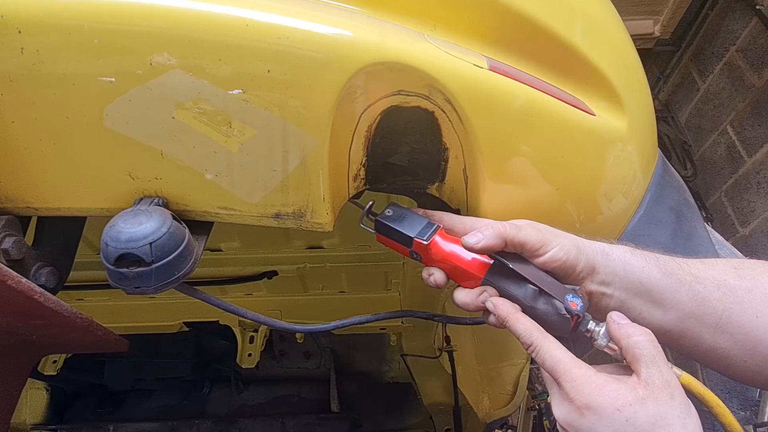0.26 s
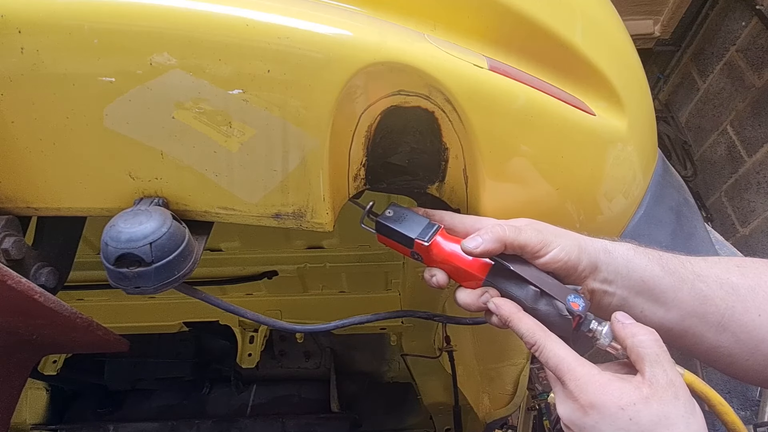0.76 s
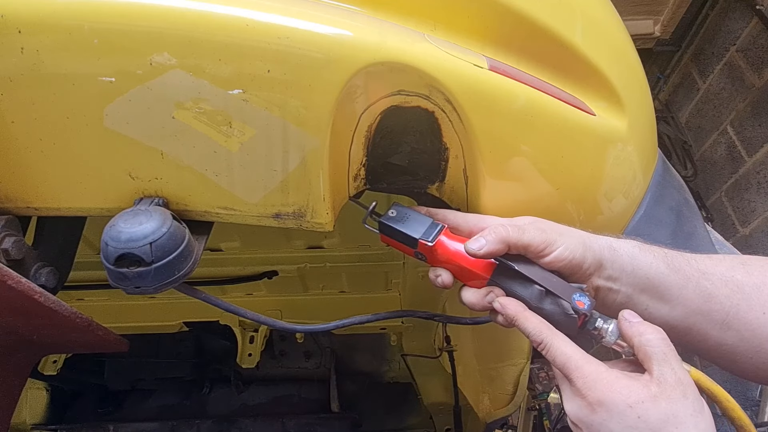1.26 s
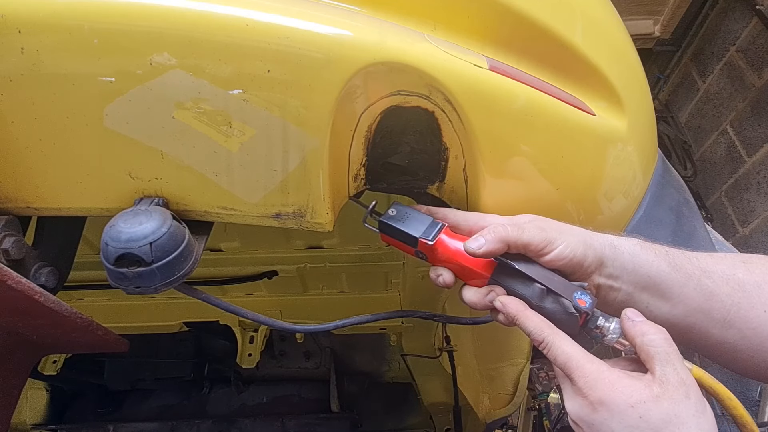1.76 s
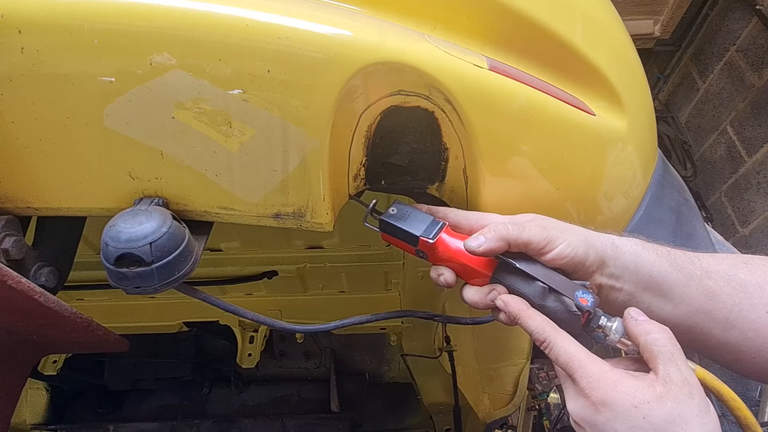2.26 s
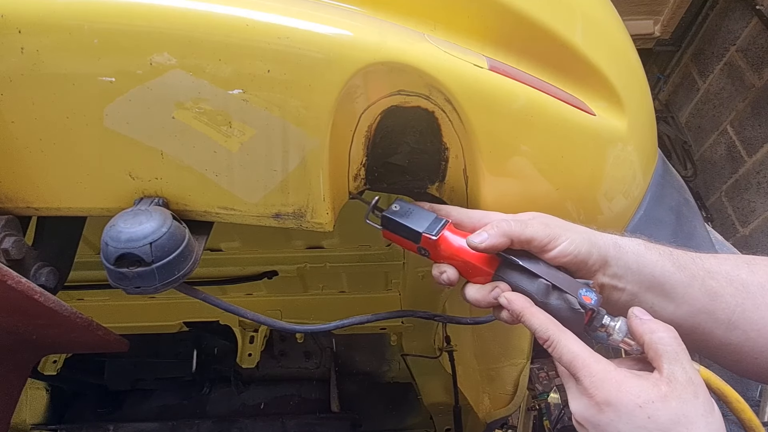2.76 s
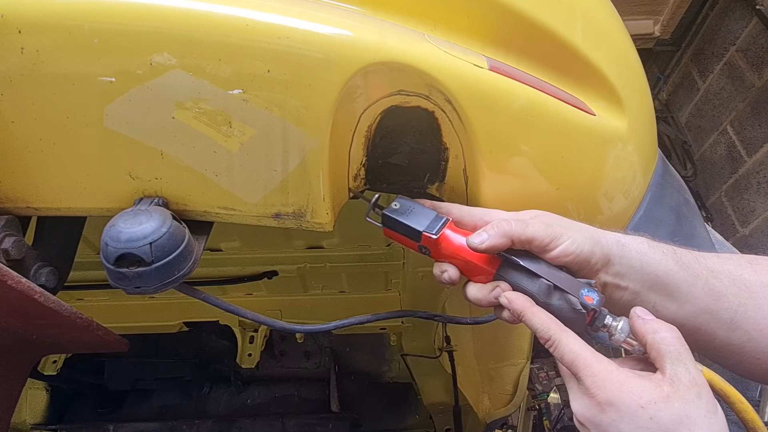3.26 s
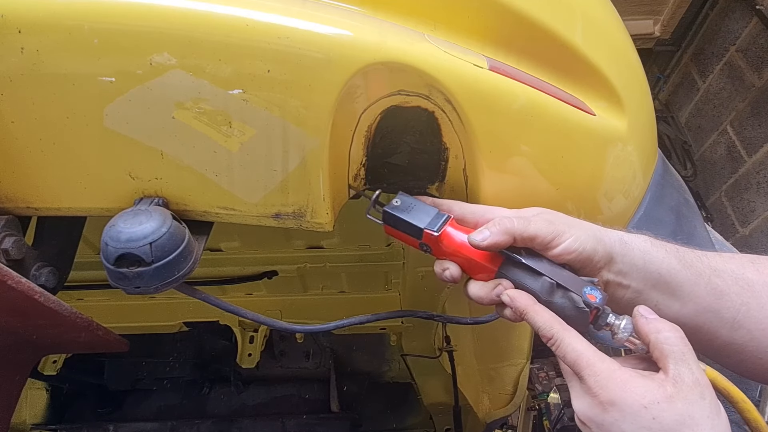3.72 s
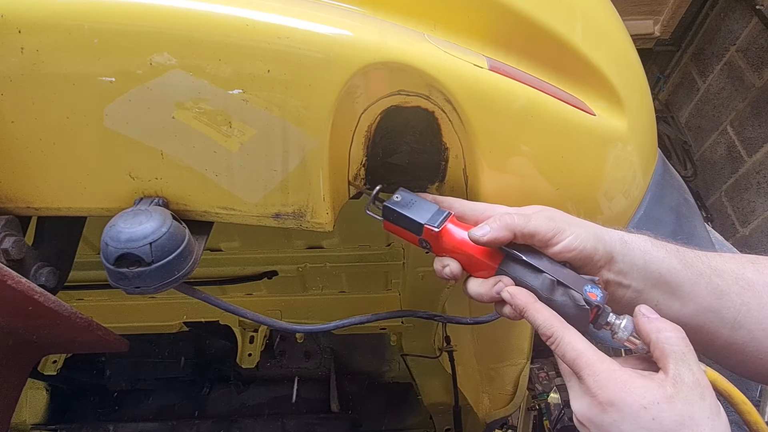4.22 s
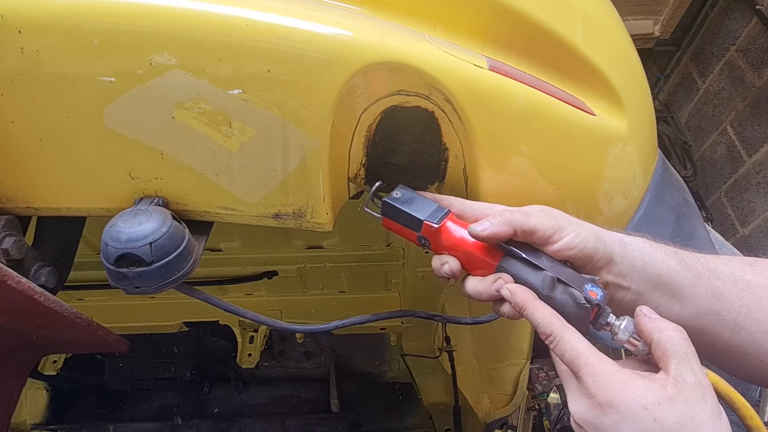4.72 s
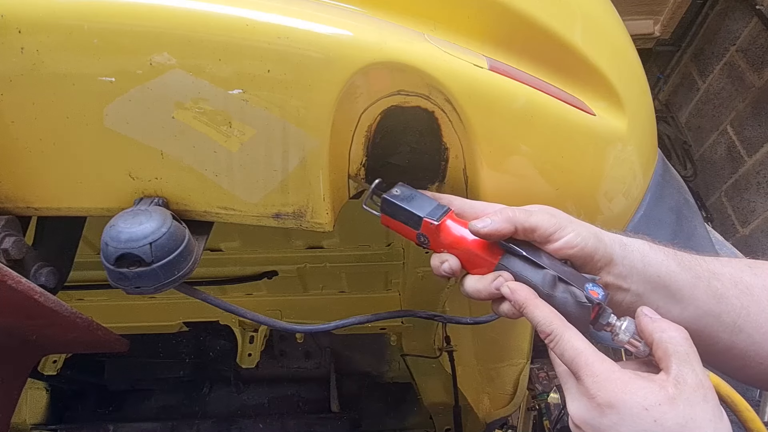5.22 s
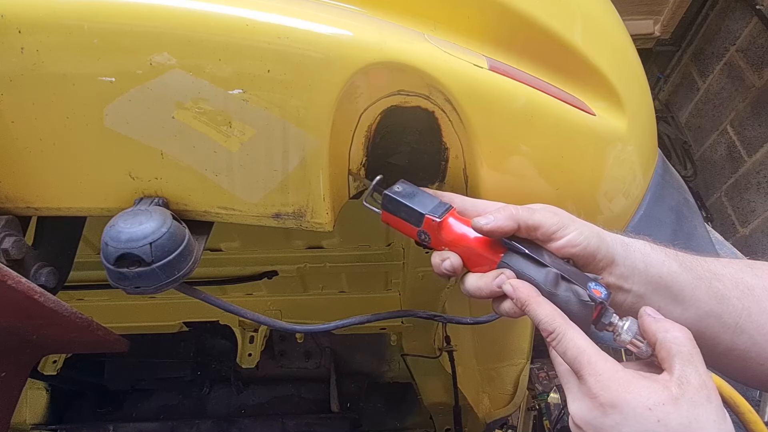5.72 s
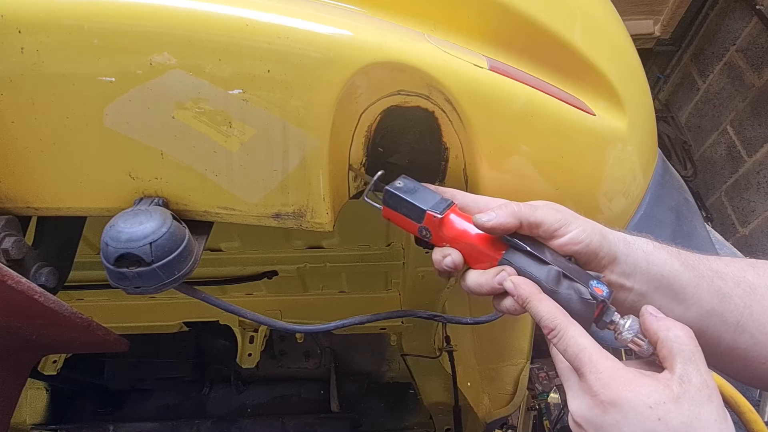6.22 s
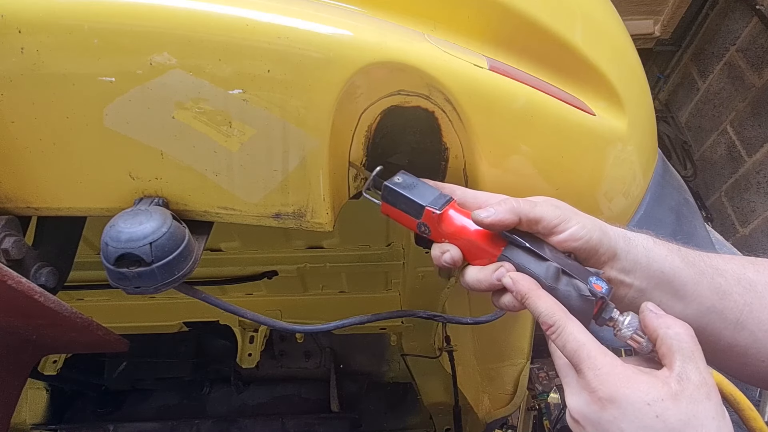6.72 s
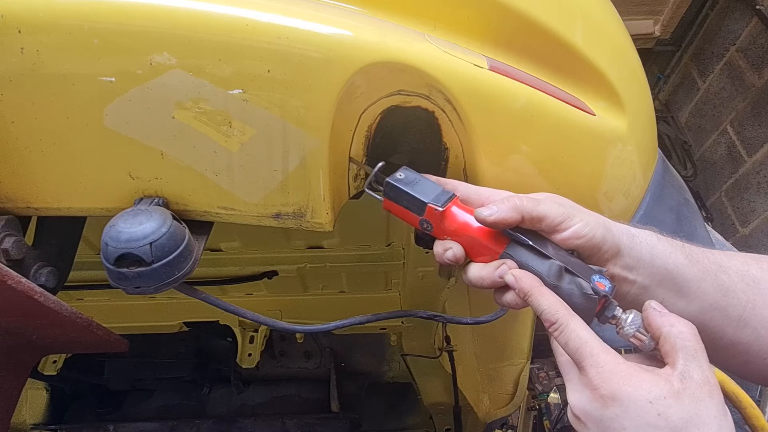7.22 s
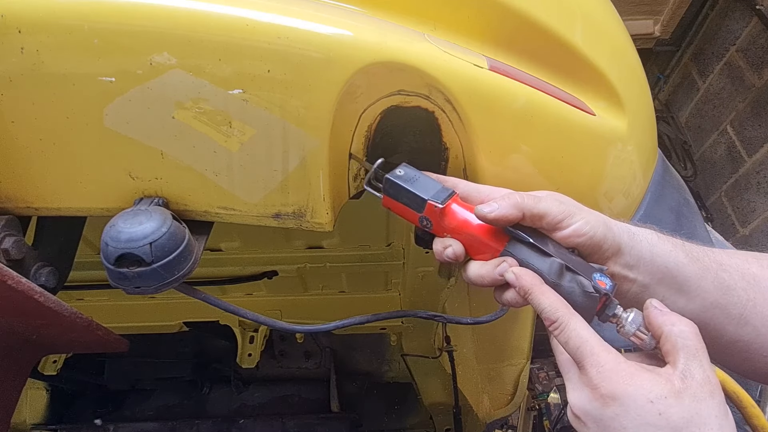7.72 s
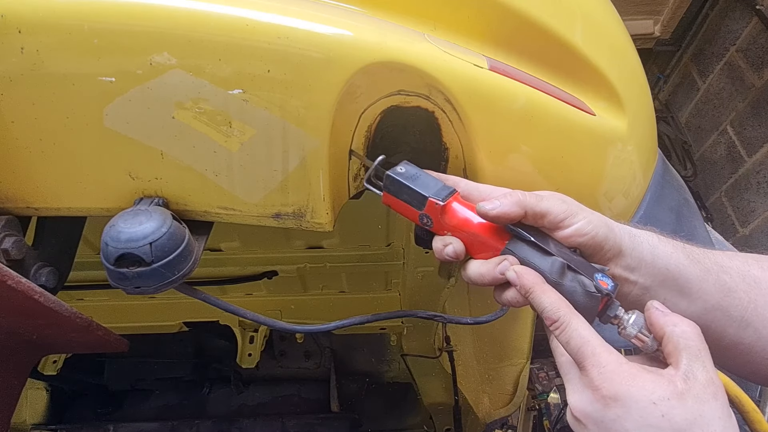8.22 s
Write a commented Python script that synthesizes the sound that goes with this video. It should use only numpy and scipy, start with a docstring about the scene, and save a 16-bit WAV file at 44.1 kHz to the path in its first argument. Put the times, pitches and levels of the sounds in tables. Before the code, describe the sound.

Close up in a garage, an air-powered saw buzzes through a plastic bumper, its rapid strokes rattling the panel over a constant hiss of air. Early on the motor slows a little under load, and the blade briefly binds and snaps free. Around the middle come two short, faint squeaks. The rasping cut carries on evenly, the hiss shifting in tone as the tool turns.

```python
"""A garage, stereo microphone at arm's length from a small pneumatic saw cutting a plastic car bumper.
The piston shakes tool and panel some 137 times a second and slows as the blade bites. The blade knocks
the panel once a stroke and rasps in the cut; spent air hisses out on both strokes and changes colour
as the tool turns along the curve. The loose bumper wobbles underneath. Just before 2 s the blade
binds, chatters and snaps free; around 4 s it is pinched and squeals twice."""
import sys
import numpy as np
from scipy import signal
from scipy.fft import rfft, irfft
from scipy.io import wavfile
from scipy.ndimage import uniform_filter1d, map_coordinates

SR = 44100
rng = np.random.default_rng(int(sys.argv[2]) if len(sys.argv) > 2 else 0)


def wav_out(sig):
    """Save sig, one row per channel (or a flat mono array), as 16-bit PCM at SR to the path in sys.argv[1]."""
    wavfile.write(sys.argv[1], SR, np.round(np.clip(np.atleast_2d(sig).T, -1, 1) * 32767).astype(np.int16))


N = 373968
TIME = np.arange(N) / SR
SIDES = np.array([[1], [-1]])  # left, right

# the blade snags and the panel chatters: t/s, jump/strokes, chatter level/dB
SNAGS = [(1.83, -.015, -21), (1.902, .015, -23), (1.917, -.01, -22)]


def undb(db):
    """Decibels to gain."""
    return 10 ** (np.asarray(db) / 20)


def unit(x):
    """Scale to rms 1."""
    return x / np.sqrt(np.mean(x ** 2))


def curves(table):
    """Each column of a time table, sample by sample."""
    s, *columns = np.transpose(table)
    return [np.interp(TIME, s, c) for c in columns]


def per_bin(table):
    """Each column of a frequency table, on the bins of a whole-length transform."""
    hz, *columns = np.transpose(table)
    bins = np.maximum(np.arange(N // 2 + 1), 1) * SR / N
    return [np.interp(np.log(bins), np.log(hz), c) for c in columns]


def colour(x, spectrum, column=0):
    """Causal filter shaped by (f/Hz, level/dB) rows, output at rms 1: it rings only after a blow."""
    cepstrum = irfft(np.log(undb(per_bin(spectrum)[column])), N)
    response = np.exp(rfft(2 * cepstrum[:N // 2], N) - cepstrum[0])
    return unit(irfft(rfft(x) * response, N))


def walk(rate):
    """Smooth, bounded random wander with spread 1, changing about rate times a second."""
    points = rng.uniform(-1, 1, N // 20)
    return unit(map_coordinates(points, [TIME * rate], order=3, mode="wrap"))


def tremble(rate):
    """A quick wander with its slow drift taken out."""
    x = walk(rate)
    return unit(x - uniform_filter1d(x, int(2 * SR / rate)))


def swell(s, length_s):
    """A rounded, flat-topped bump from 0 to 1 and back, centred on s."""
    return np.exp(-(2 * (TIME - s) / length_s) ** 4)


def blend(a, b, share):
    """Fade from a to b."""
    share = np.clip(share, 0, 1)
    return (1 - share) * a + share * b


def pan(db):
    """Left and right gains for a level difference, left minus right."""
    return undb(SIDES * db / 2)


def puff(strokes, start, rise, fall):
    """A quick swell and slower fall once a stroke; all times in strokes."""
    age = (strokes - start) % 1
    shape = (1 - np.exp(-age / rise)) * np.exp(-age / fall)
    return shape / shape.max()


def contact(light, biting, turned, bite, turn):
    """The panel's answer shifts as the blade bites, and again in the second half of the turn."""
    return blend(light, blend(biting, turned, 2 * turn - 1), bite)


def piston(sag_hz, wander_strokes=0.0035, labour_hz=0.18):
    """Strokes counted so far: the free piston wanders, labours under load and jumps at each snag."""
    # piston speed under load: t/s, stroke rate/Hz
    speed = [(0.0, 145.7), (0.4, 146.7), (0.64, 144.1), (0.87, 139.5), (1.87, 136.8), (1.96, 139.9),
             (2.5, 137.6), (3.24, 138.2), (3.68, 136.8), (4.23, 137.0), (4.58, 136.3), (4.72, 137.3),
             (6.35, 135.6), (6.61, 135.7), (7.3, 134.6), (7.77, 136), (8.24, 134.1), (8.48, 135.2)]
    hz = curves(speed)[0] - sag_hz
    jumps = sum(jump * np.clip((TIME - s) * hz, 0, 1) for s, jump, _ in SNAGS)
    return np.cumsum(hz + labour_hz * tremble(7)) / SR + wander_strokes * walk(30) + jumps


def hum(strokes, force_db, bind_db, bite, turn, flutter_db=0.2348, rough_db=0.47):
    """The piston's recoil swings the panel at partials 1-3; each knock flexes it at partials 4 and 5."""
    # panel hum, a row per multiple of the stroke rate: level/dB barely touching, biting, at the turn's
    # end; share of the force's changes followed/0-1, left minus right at full bite/dB, waver/dB
    partials = [(-38.5, -32.5, -35.5, 0.34, -2, 0.57), (-25, -18, -22, .85, -.5, 0.3),
                (-56, -43.5, -50, 0.2, -.7, 1.8), (-18, -33.5, -30.5, 1, 6.5, 1),
                (-36, -27, -25, 0.8, -2, 0.86)]
    # the fifth partial fades for a moment: t/s, length/s, change/dB
    hollows = [(1.38, 0.15, -7), (3.15, 0.47, -5.5), (5.07, 0.22, -4.5), (7.8, 0.43, -3.5)]
    swing_lag, flex_lag = 0.43, 0.059  # strokes behind the knock
    # the saw settles against the panel and pushes it one-sidedly, lifting partials 1 and 3
    seat_s, seat_takes_s, seat_db = 1.61, 0.14, 7.5
    seated_db = seat_db * np.clip((TIME - seat_s) / seat_takes_s + .5, 0, 1)
    hollow_db = sum(db * swell(s, length_s) for s, length_s, db in hollows)
    extra_db = {1: seated_db, 3: seated_db, 5: hollow_db + bind_db}
    uneven = undb(rough_db * bite * tremble(90))  # in the cut, no two knocks flex it alike
    out = 0
    for k, (light, biting, turned, follows, pan_db, waver_db) in enumerate(partials, 1):
        db = contact(light, biting, turned, bite, turn) + extra_db.get(k, 0)
        db += follows * (force_db - force_db.mean())
        db += waver_db * walk(13)
        db += flutter_db * k * bite * tremble(72)  # higher partials feel the contact more
        push, lag = (1, swing_lag) if k <= 3 else (-uneven, flex_lag)
        tone = np.sqrt(2) * np.cos(2 * np.pi * k * (strokes - lag))
        out = out + pan(pan_db * bite) * undb(db) * push * tone
    return out


def knocks(strokes, bite, turn, jitter_s=7e-6, scatter_db=1.0):
    """Once a stroke the blade hits the end of its travel and knocks the panel, never twice alike."""
    # the panel's answer to a knock: f/Hz, level/dB barely touching, biting, at the turn's end
    panel_response = [(716, 13.5, 5, 7.5), (970, -11, -4.5, -5), (1107, -3, 1, 4), (1243, 1.5, -6, -1.5),
                      (1380, -22.5, -2.5, -10.5), (1477, -13, -12, -16.5), (1743, -15.5, -22, -20),
                      (1750, -8, -11, -7), (1950, -13, -17.5, -27.5), (1954, -16, -8, -34),
                      (2280, -16, -25, -31), (2750, -13.5, -11.5, -11.5), (3900, -19, -19, -19),
                      (5060, -43, -26.5, -25), (9000, -65, -39, -34)]
    # the wide panel as it reaches the two microphone ports: f/Hz, left minus right/dB, left lead/rad
    ports = [(820, -1, 1.8), (955, -2.5, .6), (1095, 3.5, .4), (1230, 2.5, .8), (1370, 1, .4),
             (1700, 1.5, 1.7), (2050, -3, .9), (2700, 0, 2.5), (3700, -2, 1.5)]
    count = np.arange(1, int(strokes[-1]))
    chance = rng.standard_normal((len(count), 2))
    place = SR * (np.interp(count, strokes, TIME) + jitter_s * chance[:, 0])
    taps = place.astype(int)[:, None] + np.arange(-8, 9)  # a knock may land between samples
    blows = np.sinc(taps - place[:, None]) * undb(scatter_db * chance[:, 1:])
    pulses = np.bincount(np.clip(taps, 0, N - 1).ravel(), blows.ravel(), N)
    # below the sixth partial the panel moves as a whole and hums instead
    pulses = signal.sosfiltfilt(signal.butter(16, 765, "high", fs=SR, output="sos"), pulses)
    light, biting, turned = (colour(pulses, panel_response, column) for column in range(3))
    panel = contact(light, biting, turned, bite, turn)
    side_db, lead = per_bin(ports)
    return irfft(rfft(panel) * pan(side_db) * np.exp(1j * SIDES * lead / 2), N)


def housing(x, late_s=.0035):
    """Higher partials linger longer in the saw's metal housing: each knock ends in a short zing."""
    hz = np.arange(N // 2 + 1) * SR / N
    delay_s = late_s * np.clip((hz - 1550) / 1100, 0, 3)
    phase = 2 * np.pi * np.cumsum(delay_s) * SR / N
    return irfft(rfft(x) * np.exp(-1j * phase), N)


def rasp(strokes, steady=1.0, patchy_db=1.3):
    """Teeth scrape, hardest after each knock, and the loose panel rattles."""
    # scraping teeth and rattling panel: f/Hz, level/dB
    spectrum = [(40, -24), (100, -18), (160, -6.5), (240, 0.5), (310, 2.5), (410, -10), (560, -6.5),
                (700, -5.5), (900, -10.5), (1150, -5), (1600, -7), (2200, -7), (3000, -17.5), (5000, -34)]
    scrape = steady + puff(strokes, start=0, rise=0.093, fall=1.0)
    drive = scrape * undb(patchy_db * walk(31))
    mid, side = colour(drive * rng.standard_normal((2, N)), spectrum)
    return mid + side * SIDES


def exhaust(strokes, turn, leak=0.75, return_puff=0.77, grit_db=1.33, flicker_db=0.55, direct=0.57):
    """Air leaks steadily and bursts out at both stroke ends; part comes direct, part off the car."""
    # the exhaust jet at the start, middle and end of the turn: f/Hz, level/dB
    jet_start = [(1410, -32), (2400, -12), (2700, -1), (2920, -5.5), (3250, -0.5), (4070, -8.5),
                 (4440, -1.5), (5730, -5), (6250, 1), (7240, -0.5), (7650, -9.5), (8730, -8), (12100, -6.5),
                 (13100, -6.5), (15400, -6.5)]
    jet_middle = [(1410, -42), (2400, -26), (2800, -7), (3490, -7), (3740, -2), (5470, -5.5), (6060, -2),
                  (6600, -4.5), (7190, -2.5), (8870, -17), (9810, -6), (10600, -7.5), (12000, -3.5),
                  (13800, -8), (15400, -5.5)]
    jet_end = [(1410, -34), (2400, -14), (3770, -4.5), (4370, -3.5), (4800, -5), (5650, -5.5), (6700, 1.5),
               (7300, -7), (8270, -8), (8930, -17.5), (10000, -0.5), (11100, -10), (12500, -1.5),
               (13500, -7), (15400, -8)]
    flow = leak + puff(strokes, start=0.542, rise=0.024, fall=0.071)
    flow += return_puff * puff(strokes, start=0.055, rise=0.13, fall=0.11)
    gusts = undb(grit_db * walk(1800) + flicker_db * tremble(40))
    jet = rng.standard_normal((3, N)) * flow * gusts
    start, middle, end = (colour(jet, shape) for shape in (jet_start, jet_middle, jet_end))
    air = blend(start, blend(middle, end, 2 * turn - 1), 2 * turn)
    # the direct part reaches the left port a quarter cycle early
    straight = np.array([air[0], signal.hilbert(air[0]).imag])
    scattered = air[1:]
    return pan(-2.6) * (np.sqrt(direct) * straight + np.sqrt(1 - direct) * scattered)


def bounces(x, turn, gain=0.28, shift_s=0.000227):
    """Echoes off bumper, hands and floor comb the hiss; their paths change as the tool turns."""
    out = x
    for delay_s, direction in [(.0017, 1), (.0033, -1), (.0071, 1)]:
        earlier = TIME - delay_s - direction * shift_s * turn
        echo = np.array([map_coordinates(side, [earlier * SR], order=3) for side in x])
        out = out + gain * echo
    return out / np.sqrt(1 + 3 * gain ** 2)


def wobble(bite, free_db=-49, bite_db=6.5, uneven_db=2.5, width=0.4, pan_db=6.0):
    """The loose bumper wobbles on its mounts: a low, uneven rumble, stronger when the blade bites."""
    # the bumper shudders harder now and then: t/s, length/s, rise/dB
    shudders = [(2.599, 1.0, 8), (4.67, .4, 5), (8.35, 0.6, 1)]
    rumble = [(10, -30), (28, -11), (42, -4), (80, -3.5), (110, -6.5), (170, -25.5)]  # f/Hz, level/dB
    mid, side = colour(rng.standard_normal((2, N)), rumble)
    shudder_db = sum(db * swell(s, length_s) for s, length_s, db in shudders)
    db = free_db + bite_db * bite + shudder_db + uneven_db * walk(7.6)
    return pan(pan_db) * undb(db) * (mid + width * side * SIDES)


def chatter(strokes, length_s=0.0087):
    """At a snag the cut edge slaps against the blade for a few strokes."""
    edge = [(380, -30), (550, 7), (1300, 5), (1700, -16), (2200, -9), (4000, -42)]  # f/Hz, level/dB
    burst = sum(undb(db) * np.exp(-((TIME - s) / length_s) ** 2) for s, _, db in SNAGS)
    slaps = puff(strokes, start=0, rise=0.033, fall=0.19) * rng.standard_normal(N)
    return burst * colour(slaps, edge)


def squeal(blows, resonance_hz=(2000, 2110)):
    """The pinched blade rings on the partial of the knocks that meets its own resonance."""
    # the blade is pinched: t/s, length/s, level/dB
    pinches = [(3.664, .19, -44), (4.301, 0.18, -44)]
    band = signal.butter(2, resonance_hz, "band", fs=SR, output="sos")
    envelope = sum(undb(db) * swell(s, length_s) for s, length_s, db in pinches)
    return envelope * unit(signal.sosfiltfilt(band, blows))


def scene():
    """One piston drives hum, knocks, rasp and exhaust; the hand's uneven pressure sways them together."""
    # how hard the saw works: t/s, stroke force/dB, air flow/dB
    effort = [(0.0, -21, -23.5), (0.42, -21.5, -24.5), (0.64, -17.5, -22.5), (0.8, -20.5, -24),
              (0.92, -18.5, -22.5), (1.23, -19.5, -23), (1.87, -20.5, -22), (1.94, -21.5, -24.5),
              (2.43, -22, -25), (2.48, -26, -29.5), (2.62, -22.5, -26), (4.01, -21.5, -26),
              (4.25, -20, -24), (4.84, -20, -23.5), (5.24, -21.5, -25.5), (7.13, -21.5, -26),
              (7.68, -22.5, -26), (8.48, -22.5, -26.5)]
    # how the saw sits in the panel: t/s, bite/0-1, rasp level/dB, turn along the curved cut/0-1
    grip = [(0, 0.06, -34.5, 0.3), (.45, 0.15, -36, 0.23), (.65, 0.29, -36, 0.36), (.9, 0.65, -34, .11),
            (1.3, 0.75, -29.5, 0.35), (1.6, 1, -33, 0.33), (1.85, 0.75, -35.5, 0.32),
            (2.2, 0.67, -30.5, 0.4), (2.5, 0.87, -38.5, 0.3), (3.1, 0.84, -36.5, .42),
            (3.8, 0.82, -38.5, 0.53), (4.5, 0.91, -34.5, 0.58), (5.3, 0.96, -36.5, 0.63),
            (6.1, 0.96, -37.5, .86), (7, 0.96, -36, 0.99), (8.48, 0.91, -38, 0.96)]
    force_db, flow_db = curves(effort)
    bite, rasp_db, turn = curves(grip)
    knock_db, hiss_db = 1, 4  # knocks over the force, hiss over the flow
    # the blade binds ever harder, then snaps free
    bind_s, free_s, release_s = 1.57, 1.932, .012
    tightening = np.clip((TIME - bind_s) / (free_s - bind_s), 0, 1)
    bind = tightening * np.clip((free_s - TIME) / release_s, 0, 1)
    bind_db = 3 * bind
    strokes = piston(sag_hz=1.0 * bind)
    blows = housing(knocks(strokes, bite, turn))
    blade = undb(force_db + bind_db + knock_db) * blows + undb(rasp_db) * rasp(strokes) + squeal(blows)
    surge_db, judder_db = .42 * walk(12), .58 * tremble(72)  # the hand's pressure, slow and quick
    panel = undb(judder_db) * (hum(strokes, force_db, bind_db, bite, turn) + blade + chatter(strokes))
    hiss = undb(flow_db + hiss_db + .5 * judder_db) * exhaust(strokes, turn)
    return undb(surge_db) * (panel + bounces(hiss, turn)) + wobble(bite)


def record(dry):
    """The recorder cuts the top steeply."""
    top_hz = 15800
    return signal.sosfilt(signal.ellip(12, .1, 80, top_hz, fs=SR, output="sos"), dry)


dry = scene()
out = record(dry)
wav_out(out)
```